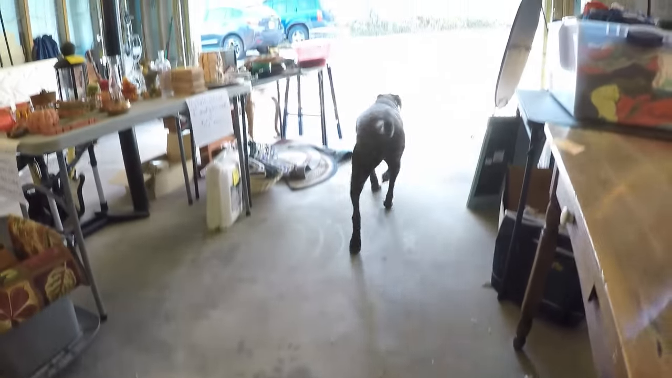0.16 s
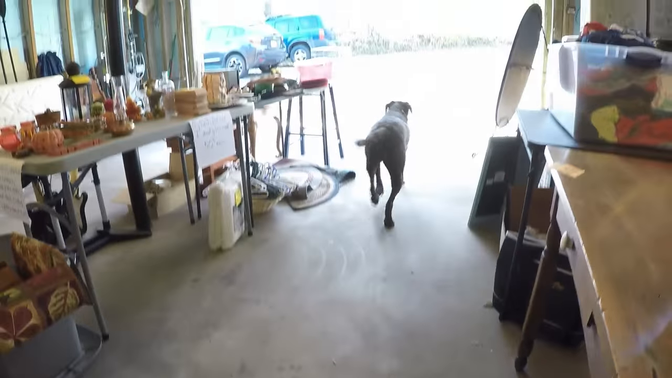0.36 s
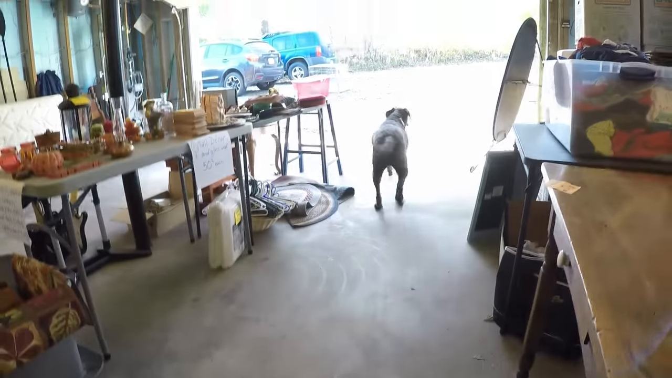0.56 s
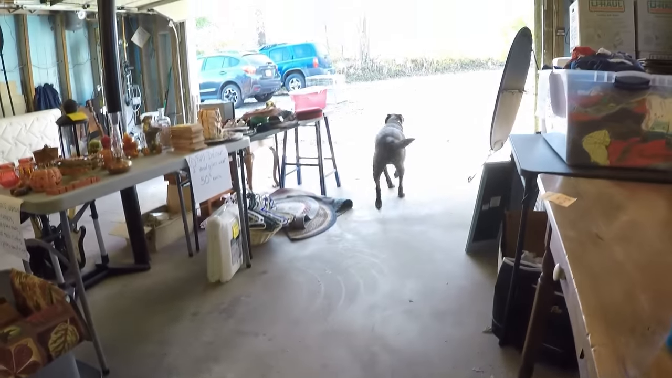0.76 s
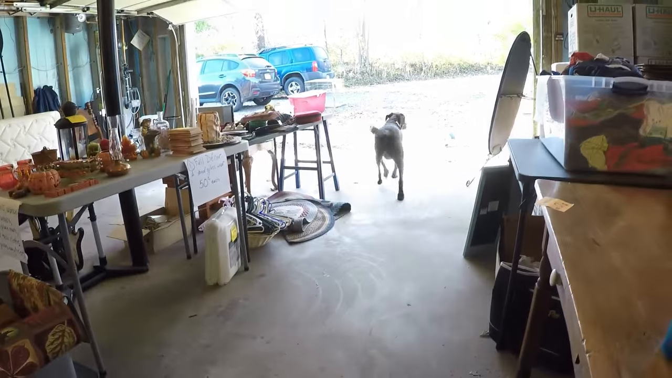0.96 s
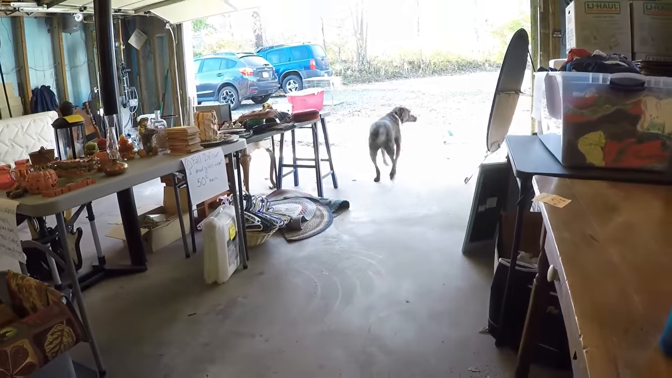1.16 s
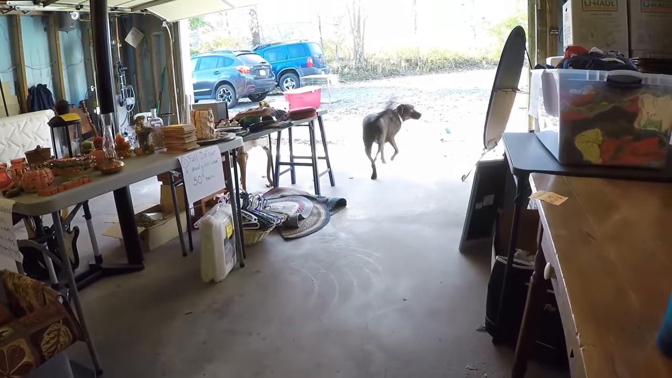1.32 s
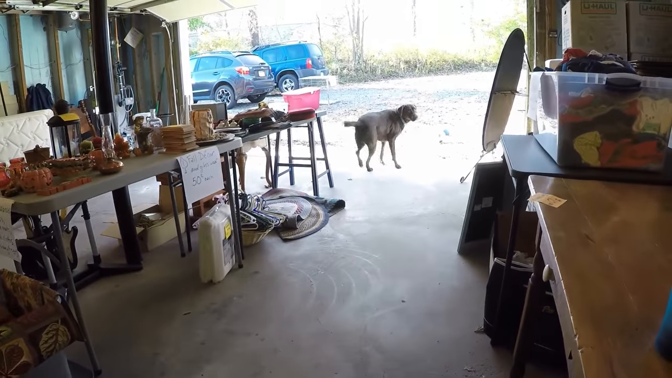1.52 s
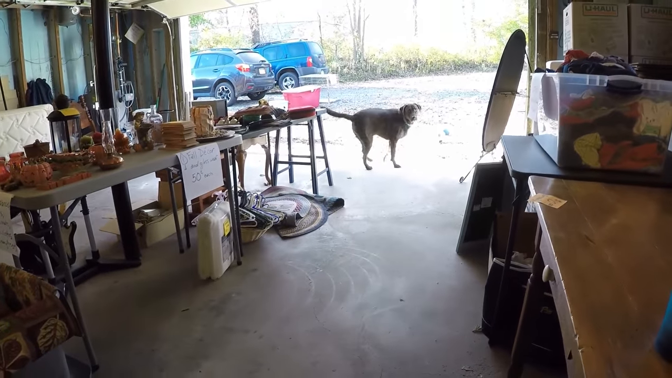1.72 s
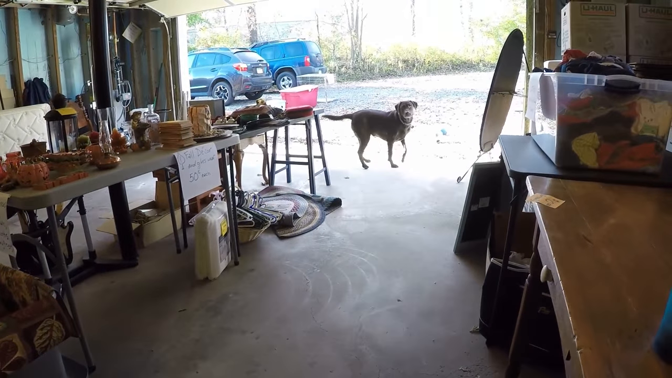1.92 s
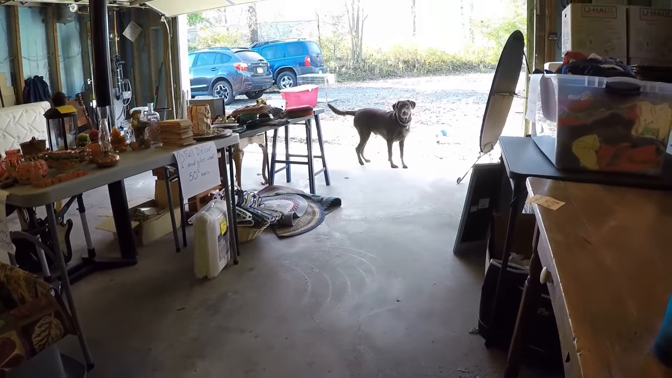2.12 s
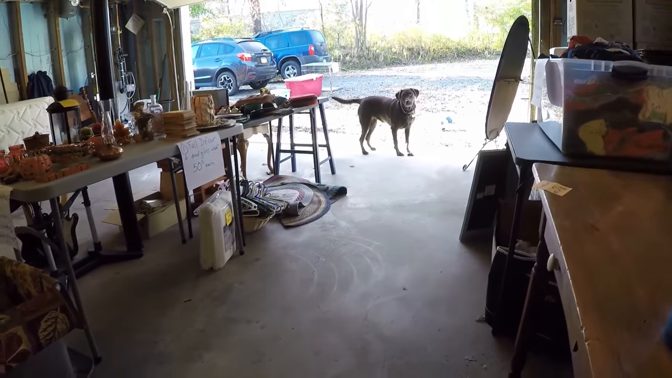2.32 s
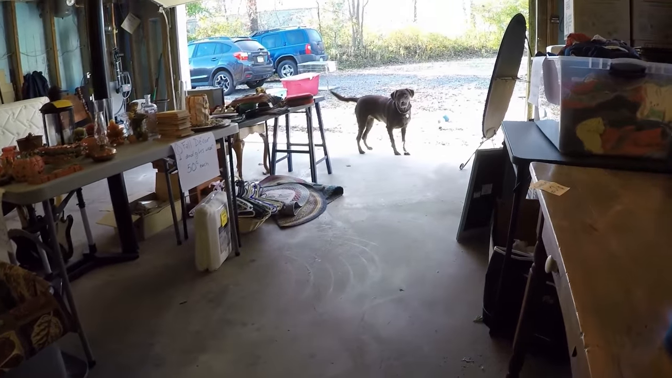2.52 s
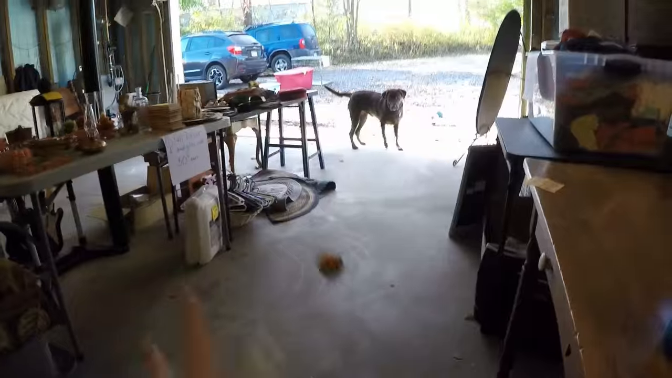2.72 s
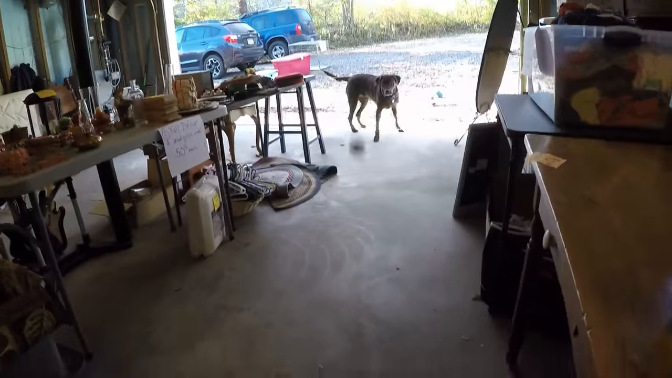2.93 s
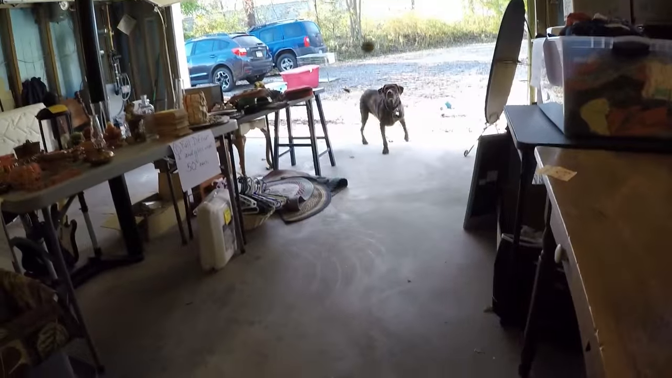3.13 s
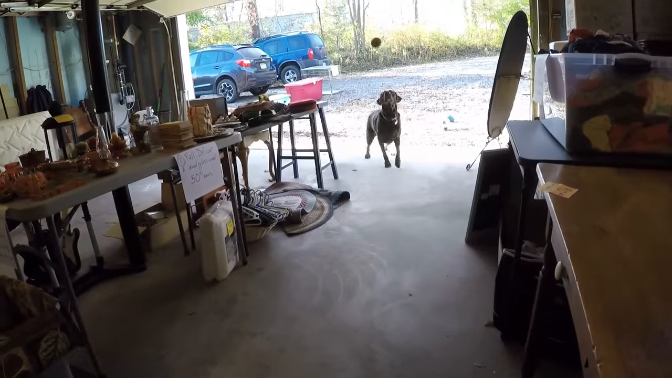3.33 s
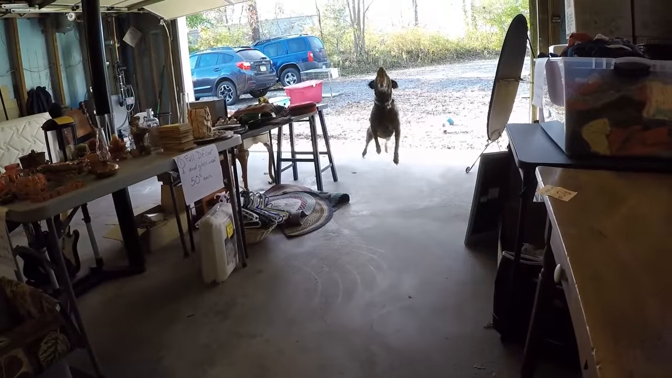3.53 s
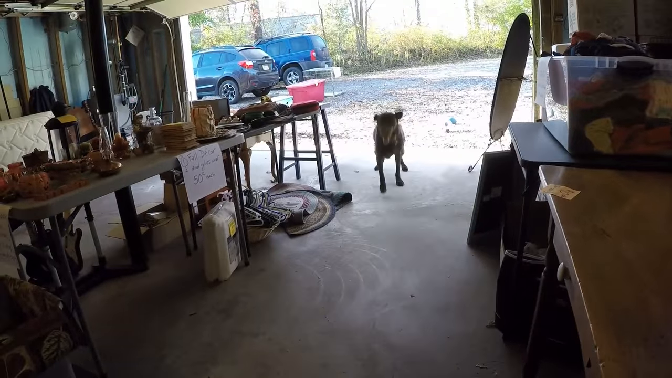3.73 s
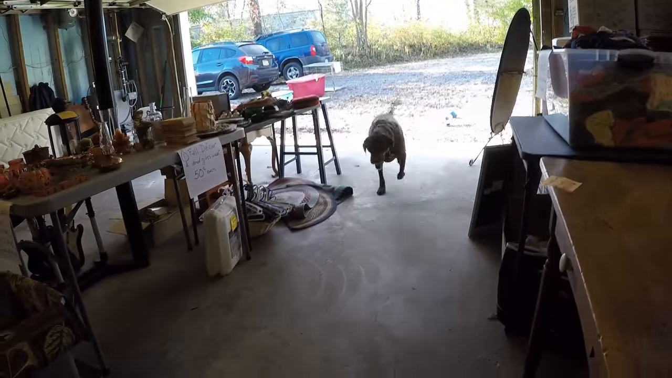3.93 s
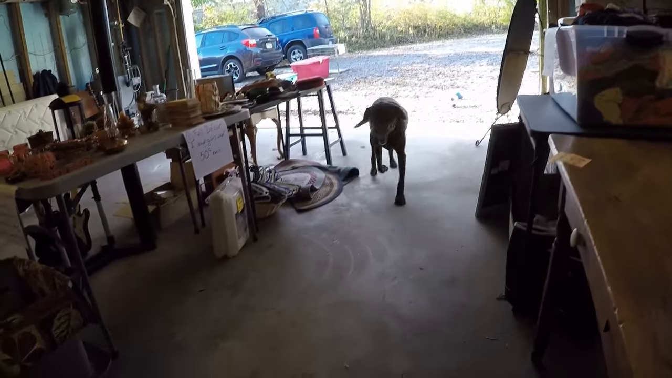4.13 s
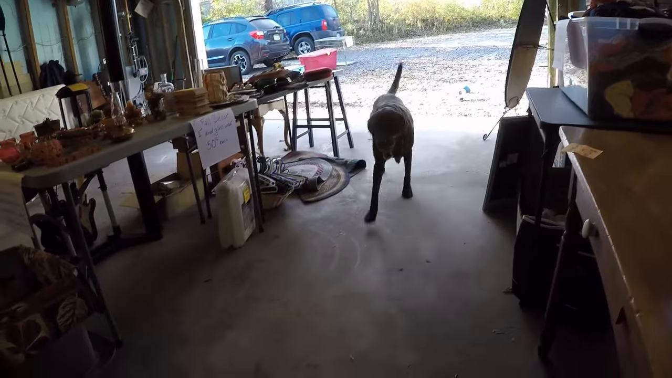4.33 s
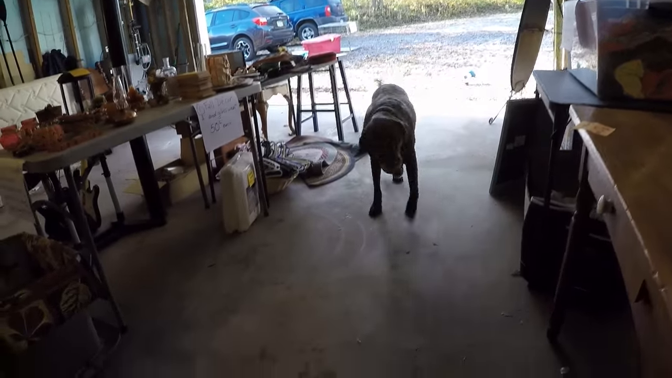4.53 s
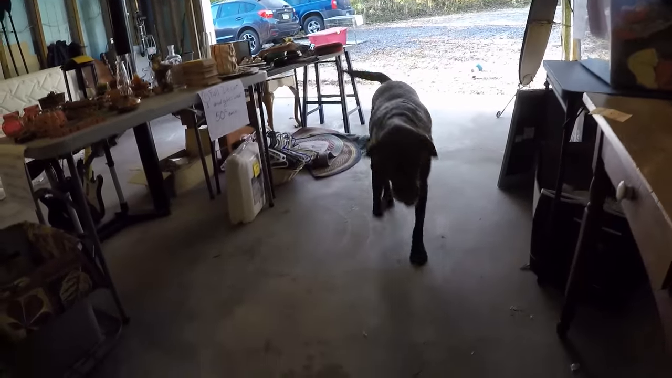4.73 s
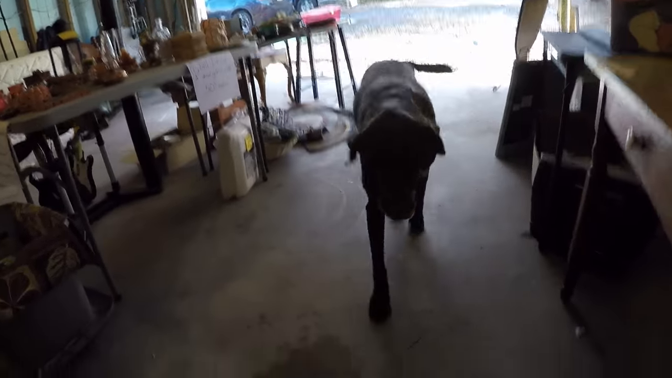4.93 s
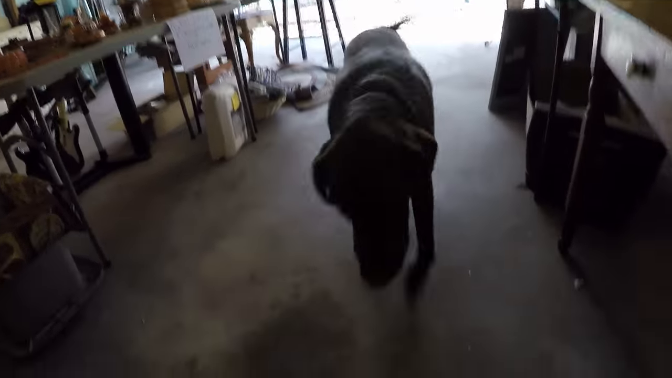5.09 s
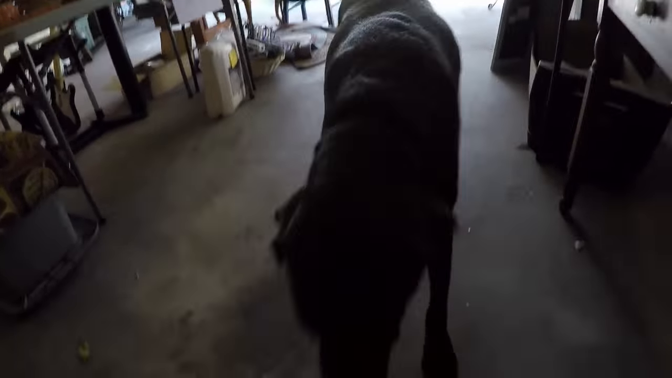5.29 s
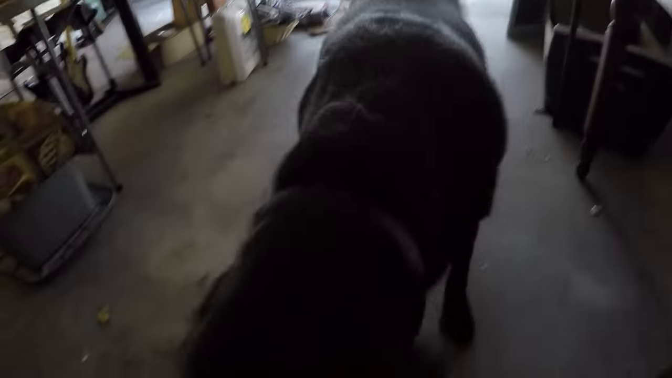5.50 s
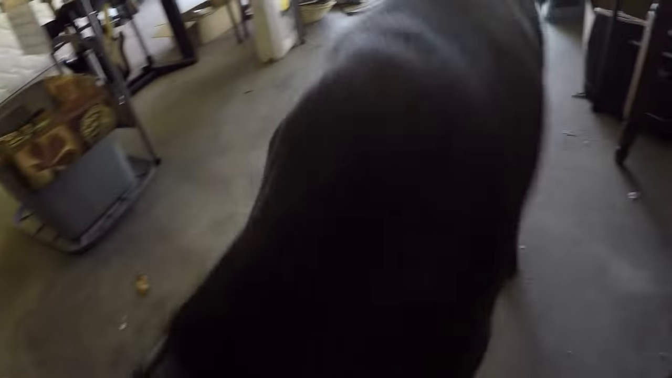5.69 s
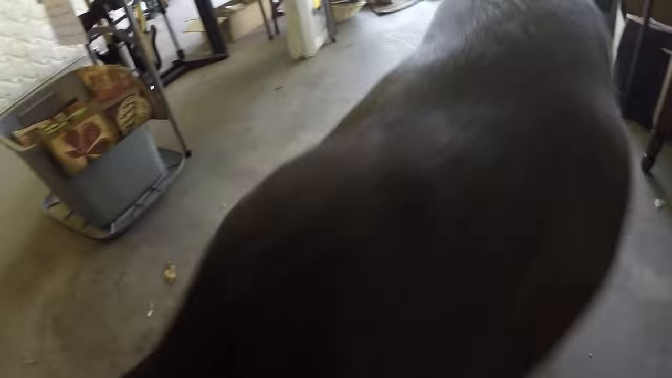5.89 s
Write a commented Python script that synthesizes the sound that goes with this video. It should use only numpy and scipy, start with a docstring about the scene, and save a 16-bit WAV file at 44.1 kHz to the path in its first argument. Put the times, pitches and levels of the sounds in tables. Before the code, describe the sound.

Dog's claws tick across a concrete garage, a ball pocks on the floor, then is caught and carried back with jingling collar tags over low hum.

```python
"""Concrete garage: a dog trots out, catches a bounced ball and brings it back.
Collar tags ring as struck metal modes; claws tick and pads scuff on the slab as filtered grit.
The ball pocks with shell modes, a low push and a felt crack; huffs are noise in throat and mouth.
A wooden bump rings early on. Below lie a far engine and low tones as wandering sines, and shaped
outdoor hiss."""
import sys
import numpy as np
from scipy import signal
from scipy.fft import rfft, irfft, next_fast_len
from scipy.io import wavfile

SR = 44100
rng = np.random.default_rng(int(sys.argv[2]) if len(sys.argv) > 2 else 0)


def to_wav(sig):
    """Store sig (one row per channel, or 1-D mono) as 16-bit WAV at the path in sys.argv[1].

    Samples outside -1..1 are clipped; the rate is SR.
    """
    pcm = np.clip(np.atleast_2d(sig), -1, 1) * 32767
    pcm = np.round(pcm).astype(np.int16)
    wavfile.write(sys.argv[1], SR, pcm.T)  # frames by channels


N = 266981

# far engine holds, shifts down, picks up again: t/s, firing f/Hz, level/dB rms, level a fifth above/dB rms
ENGINE = [(0, 112, -58, -58.5), (.45, 112.2, -49, -59.5), (.85, 110.6, -46.5, -67),
          (1.2, 110.2, -48.5, -51), (1.75, 109.1, -45, -54), (1.95, 108, -51.5, -68), (2.2, 96, -51, -61),
          (2.45, 83.8, -47, -64), (2.7, 82.4, -49, -62), (3.15, 84, -52.5, -72), (3.45, 86.4, -62, -78),
          (3.95, 86, -54, -78), (4.6, 89, -58.5, -84), (5.2, 91.2, -50.5, -77), (6.05, 92.2, -48.5, -66)]
# other low tones and a high engine overtone swell and fade:
# loudest t/s, length/s, f/Hz, rms wander/Hz, top level/dB rms
DRONES = [(0, 0.58, 98.8, 1.0, -48), (0, 1.3, 58, 1.17, -51), (1.0, 1.9, 58, 1.23, -57),
          (1.113, 1.8, 673, 10, -69), (1.197, 1.03, 100.7, 0.93, -52.5), (2.2, 0.87, 60.2, 1.23, -54.5),
          (2.3, 1.36, 169.8, 0.86, -59), (3.3, 1.9, 170, 1.1, -65), (3.5, 3.5, 104.8, 0.69, -54),
          (3.7, 1.2, 63.5, 0.94, -57.5), (5.0, 3.5, 67, 1.04, -60.5), (4.8, 1.1, 104.2, 0.96, -59),
          (5.803, 2.04, 227, 1.478, -59.5), (5.85, 1.35, 103.1, 0.997, -48), (1.002, 2.5, 210, 0.65, -73.5),
          (.7, 1.2, 185, 1.0, -66), (3.802, 1.4, 119.6, 1.0, -61.5), (4.598, 1.7, 203.5, 0.99, -65),
          (5.5, 2.6, 131.8, 1.09, -61.5)]
# outdoor hiss spectrum: f/Hz, relative density/dB
HISS_SPECTRUM = [(12, -1.5), (20, -3.5), (104, -2.5), (120, -4), (158, -11.5), (198, -11), (285, -22),
                 (513, -24), (698, -21.5), (4940, -36.5), (10500, -43), (14700, -45), (16000, -43)]
# garage decay: f/Hz, t60/s
GARAGE_T60 = [(100, 0.24), (1000, 0.29), (4000, 0.33), (12000, 0.28)]
# dog to microphone: t/s, distance/m
DISTANCE = [(0, 4.9), (1.5, 7.2), (3.6, 5.2), (4.6, 3.5), (5.4, 2.62), (6.05, 1.6)]
# modes of the bumped wooden thing: f/Hz, level/dB, t60/s
KNOCK_MODES = [(457, -14, 0.1), (827, -16, 0.067), (1360, -15.5, .023), (1543, -10.5, .021),
               (1900, -12.5, 0.012), (2805, -19.5, 0.046), (3340, -9.5, 0.037), (4800, -20, .015)]
# ball on floor, then in jaws: t/s, overall gain/dB, low push/dB, crack/dB, shell tilt/(dB/octave)
BALL_HITS = [(2.863, -15.5, -2, 17.5, 3), (3.586, -17.5, -17, 11.5, -6.5)]
# ball shell: f/Hz, level before tilt/dB, t60/s
BALL_MODES = [(539, -16.5, 0.071), (646, -4.5, 0.031), (700, -14.5, 0.042), (838, -8.5, 0.027),
              (1125, -1.5, 0.0055), (1700, -2.5, 0.004)]
# soft low thuds: t/s, level/dB, f/Hz
THUMPS = [(2.66, -33.5, 30.9), (3.746, -33.5, 193)]
# huffs: t/s, length/s, throat drive/dB, mouth drive/dB, mouth pitch factor
HUFFS = [(2.639, 0.037, -58, -75, 1.01), (4.471, 0.034, -55, -41.5, 1.23), (4.506, 0.03, -46.5, -67, 1.7),
         (5.107, 0.043, -51.5, -67, 1.2), (5.467, 0.0697, -57, -62, 1.03), (5.573, 0.1, -57, -47.5, 1.02),
         (5.824, 0.021, -59, -69, 1.2)]
# throat resonances: f/Hz, width of each of two passes/Hz, level/dB
THROAT = [(583, 170, 14.5), (750, 160, -1.5)]
# mouth resonances: f before pitch factor/Hz, width of each of two passes/Hz, level/dB
MOUTH = [(1770, 130, 4), (2170, 1200, 11.5), (2880, 1600, -3.5), (3900, 3000, -3)]
# sliding pads, and one bright hiss of rattling tags:
# start t/s, rise/s, hold/s, fall/s, held level at reference distance/dB rms, centre f/Hz
SCUFFS = [(0.041, .02, 0.035, 0.16, -64.5, 3590), (2.349, .05, 0.078, 0.059, -59, 2330),
          (3.372, .15, 0.08, 0.052, -46.5, 4300), (3.716, 0.0042, 0.042, 0.11, -40.5, 4870),
          (3.817, 0.053, 0.08, 0.19, -55, 8700), (5.3, .03, 0.086, 0.31, -67.5, 2170),
          (5.295, 0.063, 0.099, 0.17, -66.5, 750), (5.635, .045, 0.0042, 0.066, -57.5, 4600)]
# claws on concrete, and a few loud echoes of them: t/s, peak at reference distance/dB, centre f/Hz
CLAWS = [(0.0653, -44.5, 3660), (0.243, -42.5, 5450), (0.496, -46, 3400), (0.5266, -45.5, 4980),
         (0.622, -38.5, 4850), (0.6974, -47, 3630), (0.7992, -46.5, 3500), (0.9545, -40, 4700),
         (1.101, -45.5, 3780), (1.494, -46, 6700), (1.6085, -43, 5560), (2.6269, -44.5, 5240),
         (3.2494, -56, 6590), (3.7177, -20, 4800), (3.722, -29, 4960), (3.744, -44, 4760),
         (3.7504, -22.5, 4970), (3.8114, -37, 5250), (3.8436, -25, 4250), (4.0254, -45, 3870),
         (4.1087, -29, 4730), (4.1694, -36, 3930), (4.3211, -30.5, 4500), (4.4398, -30.5, 3340),
         (4.4745, -42, 2868), (4.507, -32.5, 3240), (4.6379, -32, 3530), (4.692, -65, 4600),
         (4.7185, -36, 4450), (4.762, -40, 3920), (4.9858, -41.5, 5840), (5.008, -28.5, 4560),
         (5.1004, -43, 3940), (5.287, -29, 5264), (5.3418, -47, 5560), (5.657, -41, 5660),
         (5.6795, -41.5, 4340), (5.791, -49.5, 2726), (5.9027, -37, 3470)]
# collar strikes: t/s, drive of first tag/dB, second tag/dB, third tag/dB, collar ring/dB
STRIKES = [(0.7394, -67, -76, -72, -62.5), (0.877, -65, -78, -83, -81), (1.1757, -65.5, -72, -72, -79),
           (1.4431, -77, -86, -84, -82), (1.5382, -57.5, -66, -70, -80), (1.8786, -58.5, -75, -67, -76),
           (2.2164, -72.5, -88, -88, -86), (2.387, -69, -83, -87, -88), (3.8211, -46, -59, -62, -72),
           (3.8626, -44, -37.5, -47, -41), (3.9144, -43, -59, -42, -57), (3.959, -51, -58, -48, -52),
           (4.1659, -54, -60, -59, -71.5), (4.3229, -42, -44.5, -53, -80), (4.349, -40, -50.5, -57, -72),
           (4.4092, -47, -56, -58, -76), (4.6374, -61, -71, -61, -52.5), (4.892, -54.5, -78, -74, -80),
           (5.1018, -60.5, -70, -70, -74), (5.2717, -73, -89, -84, -86)]
# modes of the collar pieces: f/Hz, level/dB, t60/s, piece index (0-2 tags, 3 collar ring)
TAG_MODES = [(10365, -6, .13, 0), (10448, -2, .19, 0), (10530, -14, .08, 0), (8560, -24, .12, 0),
             (3887, -4, .11, 1), (3960, -12, .05, 1), (11194, -2, .11, 1), (11290, -5, .12, 1),
             (11400, -4, .12, 1), (15195, 0, .1, 1), (15241, 3, .11, 1), (11960, -6, .2, 2),
             (12048, -2, .22, 2), (3455, 1, .26, 3), (3490, -9, .15, 3), (4400, 0, .04, 3),
             (6400, -6, .04, 3)]

ENGINE_WANDER_HZ, HISS_RMS_DB = 0.83, -51
REFERENCE_DISTANCE_M = 6.4
GARAGE_DB, FIRST_ECHO_S = -4.5, 0.0019
CEILING_ECHO_S, CEILING_ECHO_DB = 0.0065, -6
KNOCK_S, KNOCK_DB = 0.296, -29
SQUASH_HZ = 240  # the soft squash of the ball pushes only lows
GRAINS_PER_S, SCUFF_RANGE_DB = 4000, 31  # range: depth of rise and fall
GRIT_GAIN, GRIT_S = 0.05, 0.0018  # grit behind a contact
CLAW_EDGE_DB = -11
RATTLE_S, REBOUND_DB = 0.022, -11  # latest rebound; rebounds below the blow
CLACK_DB, MODE_SPREAD_DB = -4.5, 5.5  # broad contact; uneven sharing of force among modes
FLICKER_PER_S, FLICKER_DB_AT_12_KHZ = 80, 5  # random flicker of the ringing, deeper for high modes
TOP_STEP_HZ, CUTOFF_HZ = 15650, 16650  # treble drops in a step; treble is cut


def from_db(db):
    """Decibels to gain."""
    return 10 ** (np.asarray(db) / 20)


def rms_one(x):
    """Scale to unit rms."""
    return x / np.sqrt(np.mean(x ** 2) + 1e-20)


def in_time(rows):
    """Columns of a curve, one value a sample."""
    s, *columns = np.transpose(rows)
    return [np.interp(np.arange(N) / SR, s, c) for c in columns]


def at_hz(points, hz):
    """Read a spectrum on a log-frequency axis."""
    point_hz, value = np.array(points).T
    return np.interp(np.log(hz), np.log(point_hz), value)


def drift(rate_hz):
    """Random motion of unit rms: noise through two equal one-pole low-passes."""
    r = np.exp(-2 * np.pi * rate_hz / SR)
    noise = rng.standard_normal(N + SR)
    return rms_one(signal.lfilter([1], [1, -2 * r, r * r], noise)[SR:])  # filter settles for 1 s


def ring(clicks, hz, t60_s):
    """Struck mode: a unit click sets a decaying sine of height 1 ringing."""
    r, w = from_db(-60 / (t60_s * SR)), 2 * np.pi * hz / SR
    return signal.lfilter([0, np.sin(w)], [1, -2 * r * np.cos(w), r * r], clicks + 1e-18)


def resonate(x, hz, width_hz):
    """Two-pole band-pass of gain 1 on top."""
    r = np.exp(-np.pi * width_hz / SR)
    poles = [1, -2 * r * np.cos(2 * np.pi * hz / SR), r * r]
    return signal.lfilter([(1 - r * r) / 2, 0, (r * r - 1) / 2], poles, x)


def butter(x, order, hz, kind):
    """Butterworth filter."""
    return signal.sosfilt(signal.butter(order, hz, kind, fs=SR, output="sos"), x)


def contact_grit(t):
    """One sharp contact with a little decaying grit behind it."""
    return (t == 0) + GRIT_GAIN * rng.standard_normal(len(t)) * np.exp(-t / GRIT_S)


def add(out, s, sound):
    """Mix a sound in at s seconds."""
    at = round(s * SR)
    out[at:at + len(sound)] += sound[:N - at]


def hiss():
    """Outdoor hiss: steady noise shaped by a density spectrum."""
    size = next_fast_len(N)
    hz = np.arange(1, size // 2 + 2) * SR / size
    spectrum = rfft(rng.standard_normal(size)) * from_db(at_hz(HISS_SPECTRUM, hz))
    return from_db(HISS_RMS_DB) * rms_one(irfft(spectrum, size)[:N])


def hum():
    """Far engine, other low tones and a high engine overtone: near sines whose pitch wanders a little."""
    t = np.arange(N) / SR
    hz, level_db, fifth_db = in_time(ENGINE)
    phase = 2 * np.pi * np.cumsum(hz + ENGINE_WANDER_HZ * drift(3.04)) / SR
    out = from_db(level_db) * np.sin(phase) + from_db(fifth_db) * np.sin(3 * phase / 2)
    for s, length_s, hz, wander_hz, level_db in DRONES:
        swell = np.cos(np.pi * np.clip((t - s) / length_s, -.5, .5)) ** 2
        phase = 2 * np.pi * np.cumsum(hz + wander_hz * drift(3.18)) / SR
        out += from_db(level_db) * swell * np.sin(phase)
    return np.sqrt(2) * out  # levels are rms


def garage(x):
    """Diffuse tail: octave noise bands, each with its own decay; the open door lets the deep bass out."""
    t = np.arange(SR // 2) / SR
    tail = np.zeros(len(t))
    for low_hz in 80 * 2. ** np.arange(8):
        band = butter(rng.standard_normal(len(t)), 2, [low_hz, min(2 * low_hz, .45 * SR)], "band")
        t60_s = at_hz(GARAGE_T60, low_hz * np.sqrt(2))
        tail += band * from_db(-60 * t / t60_s)
    tail *= np.clip(t / FIRST_ECHO_S - 1, 0, 1)
    tail /= np.sqrt(np.sum(tail ** 2))
    return from_db(GARAGE_DB) * signal.fftconvolve(x, tail)[:N]


def knock():
    """Something wooden is bumped: a rattling noise burst, 30 ms decay, rings its modes."""
    out, t = np.zeros(N), np.arange(15000) / SR
    bump = rng.standard_normal(len(t)) * np.minimum(t / 0.0013, 1) * np.exp(-t / 0.03) / 15
    modes = sum(from_db(db) * ring(bump, hz, t60_s) for hz, db, t60_s in KNOCK_MODES)
    rattle = 6.8 * resonate(bump, 3800, 2600)
    add(out, KNOCK_S, from_db(KNOCK_DB) * (modes + rattle))
    return out


def ball():
    """Hollow ball pocks: a low push, shell modes and a crack of felt; soft thuds ring one low mode."""
    out, t = np.zeros(N), np.arange(8000) / SR
    click = (t == 0) * 1.
    for s, gain_db, low_db, crack_db, tilt_db in BALL_HITS:
        shell = np.zeros(len(t))
        for hz, db, t60_s in BALL_MODES:
            shell += from_db(db + tilt_db * np.log2(hz / 600)) * ring(click, hz, t60_s)
        # a small shell sends out no bass, the felt damps its top
        shell = butter(shell, 2, [470, 2200], "band")
        push = ring(click, 111, 0.06) + 0.87 * ring(click, 170, 0.067) + 0.29 * ring(click, 80, 0.099)
        push = from_db(low_db) * butter(push, 4, SQUASH_HZ, "low")
        felt = contact_grit(t)
        crack = resonate(felt, 2600, 2800) + 0.06 * resonate(felt, 16000, 6900)
        add(out, s, -from_db(gain_db) * (shell + push + from_db(crack_db) * crack))
    for s, level_db, hz in THUMPS:
        add(out, s, from_db(level_db) * ring(click, hz, 6.8 / hz))
    return out


def huffs():
    """Puffs of air past the ball: noise in throat and mouth resonances, quick to start."""
    def tract(air, resonances, pitch):
        """Parallel resonances, each passed twice."""
        return sum(from_db(db) * resonate(resonate(air, pitch * hz, width_hz), pitch * hz, width_hz)
                   for hz, width_hz, db in resonances)

    out = np.zeros(N)
    for s, length_s, throat_db, mouth_db, pitch in HUFFS:
        t = np.arange(round(length_s * SR)) / SR
        air = rng.standard_normal(len(t))
        throat = from_db(throat_db) * rms_one(tract(air, THROAT, 1))
        mouth = from_db(mouth_db) * rms_one(tract(air, MOUTH, pitch))
        shape = np.interp(t, [0, .008, 0.82 * length_s, length_s], [0.18, 0.66, 0.044, 0.23])
        add(out, s, shape * (throat + mouth))
    return out


def scuffs():
    """Dense band-passed grains, sliding pads or tag hiss: they swell, hold and die."""
    grains = (rng.random(N) < GRAINS_PER_S / SR) * rng.standard_normal(N)
    grains = grains + 0.64 * rng.standard_normal(N)
    out, t = np.zeros(N), np.arange(N) / SR
    for s, rise_s, hold_s, fall_s, level_db, hz in SCUFFS:
        corners_s = s + np.cumsum([0, rise_s, hold_s, fall_s])
        # 99 dB down outside the scuff
        below_db = np.interp(t, corners_s, [SCUFF_RANGE_DB, 0, 0, SCUFF_RANGE_DB], 99, 99)
        out += from_db(level_db - below_db) * rms_one(resonate(grains, hz, 0.8 * hz))
    return out


def claws():
    """Claw ticks and a few loud echoes: contact plus grit in a broad band, with a bright edge."""
    out, t = np.zeros(N), np.arange(4000) / SR
    for s, peak_db, hz in CLAWS:
        grit = contact_grit(t)
        body = resonate(resonate(grit, hz, hz), hz, 3.75 * hz)
        tick = body + from_db(CLAW_EDGE_DB) * butter(grit, 2, 9000, "high")
        add(out, s, from_db(peak_db) * tick / np.abs(tick).max())
    return out


def tags():
    """A strike is a blow and three quick rebounds; each excites the modes of the pieces it hits."""
    out, rows = np.zeros(N), np.array(STRIKES)
    delays_s = RATTLE_S * rng.random((len(rows), 4)) * [0, 1, 1, 1]
    at = np.round((rows[:, :1] + delays_s) * SR).astype(int)
    fade_db = REBOUND_DB * np.array([0, 1, 1, 1])
    for hz, mode_db, t60_s, piece in TAG_MODES:
        clicks = np.zeros(N)
        spread_db = rng.normal(0, MODE_SPREAD_DB, at.shape)
        np.add.at(clicks, at, from_db(rows[:, [piece + 1]] + fade_db + mode_db + spread_db))
        flicker_db = FLICKER_DB_AT_12_KHZ * np.sqrt(hz / 12000) * drift(FLICKER_PER_S)
        out += from_db(flicker_db) * ring(clicks, hz, t60_s)
    out = butter(out, 2, 2500, "high")  # small pieces send out no lows
    clicks = np.zeros(N)
    hardest_db = rows[:, 1:].max(axis=1, keepdims=True)
    np.add.at(clicks, at, from_db(hardest_db + fade_db + CLACK_DB))
    clack = resonate(resonate(clicks, 11500, 6000), 11500, 9000)
    return out + clack


def scene():
    """Dog's direct sound falls with distance, the diffuse tail does not; two equal channels."""
    direct = REFERENCE_DISTANCE_M / in_time(DISTANCE)[0]
    taps, bounce, bump = claws(), ball(), knock()
    near, breath = tags() + scuffs(), huffs()
    send = from_db(11) * taps + from_db(7.5) * bounce + from_db(1.0) * near
    send += from_db(3.5) * breath + from_db(2.0) * bump
    wet = garage(send)
    # one clear early reflection
    add(wet, CEILING_ECHO_S, from_db(CEILING_ECHO_DB) * (direct * taps + bounce))
    mono = direct * (taps + near + breath) + bounce + bump + wet + hum() + hiss()
    return np.array([mono, mono])


def record(dry):
    """Top drops by a 32 dB step, then is cut by a further 50 dB."""
    stepped = signal.sosfilt(signal.cheby2(10, 32, TOP_STEP_HZ, fs=SR, output="sos"), dry)
    return signal.sosfilt(signal.cheby2(12, 50, CUTOFF_HZ, fs=SR, output="sos"), stepped)


dry = scene()
out = record(dry)
to_wav(out)
```